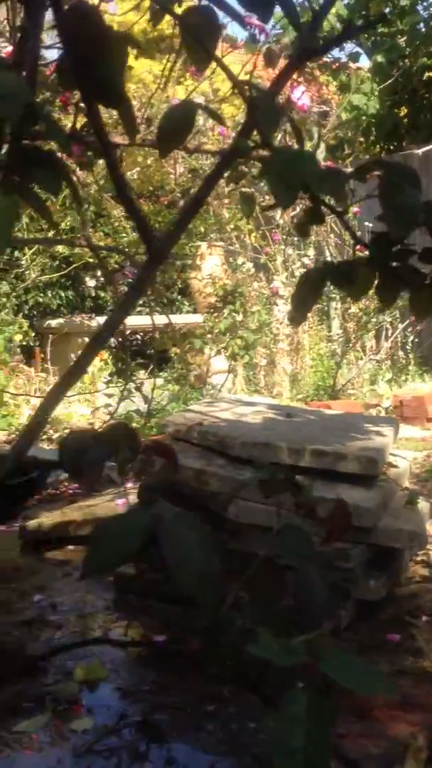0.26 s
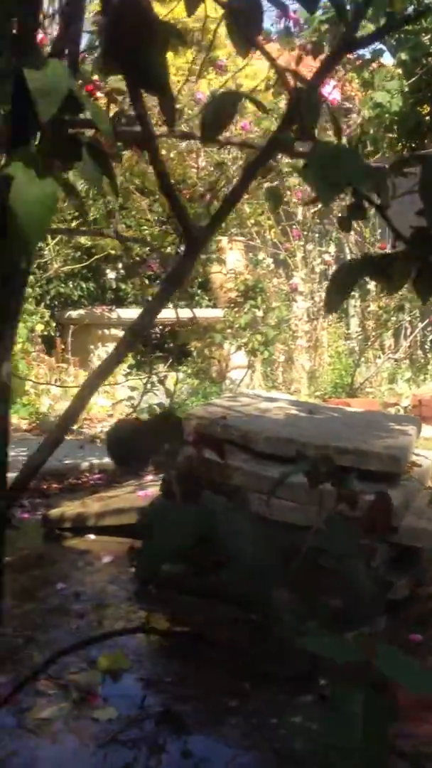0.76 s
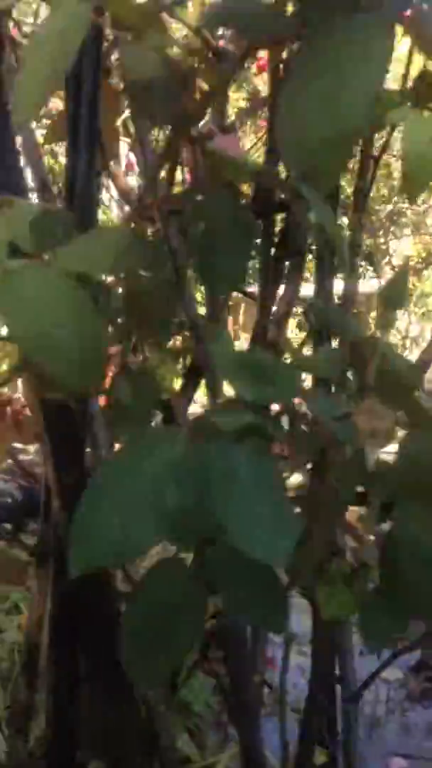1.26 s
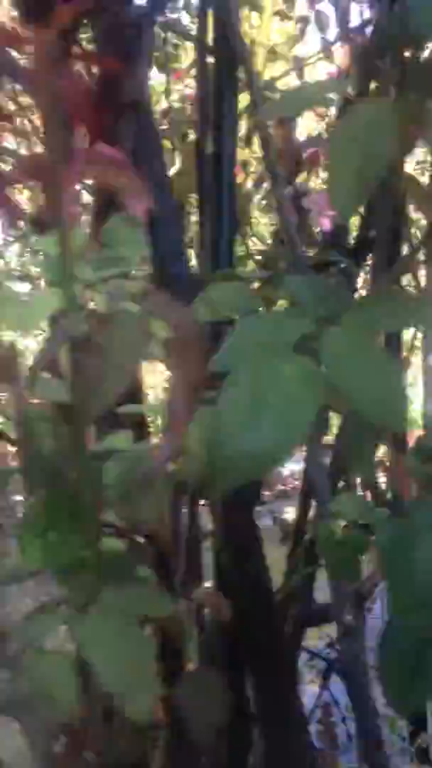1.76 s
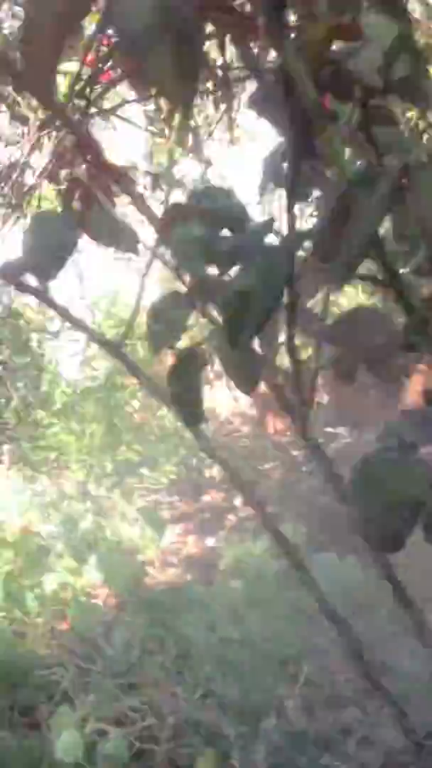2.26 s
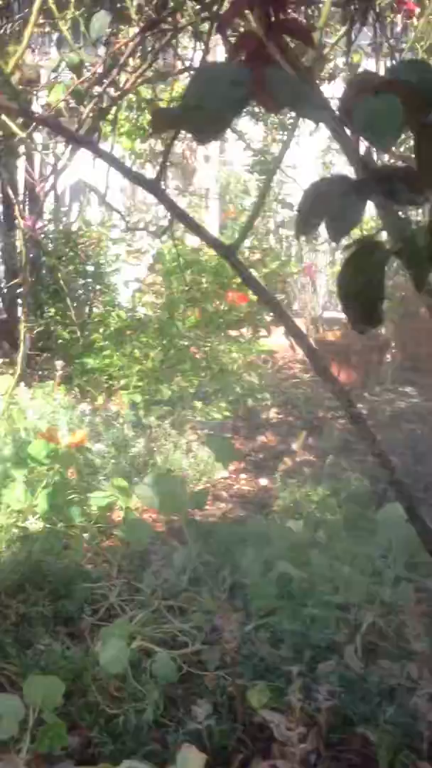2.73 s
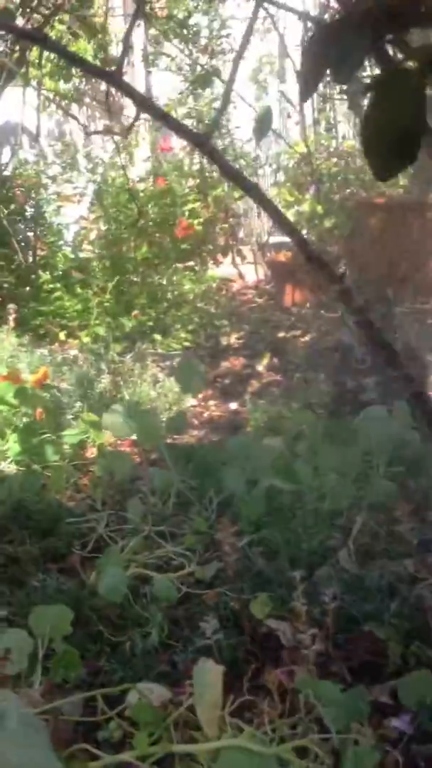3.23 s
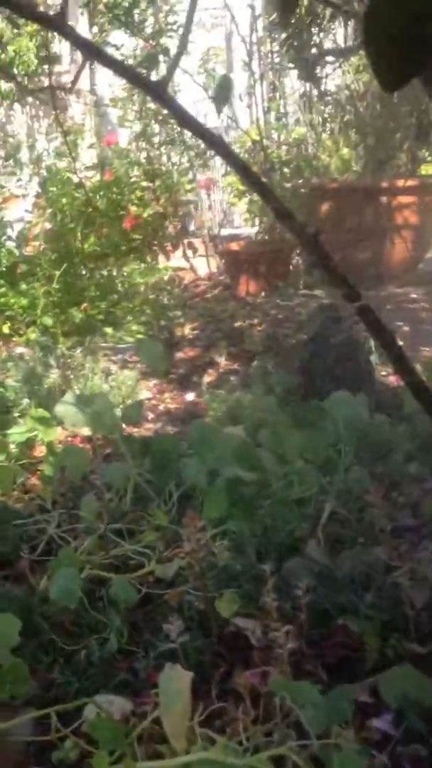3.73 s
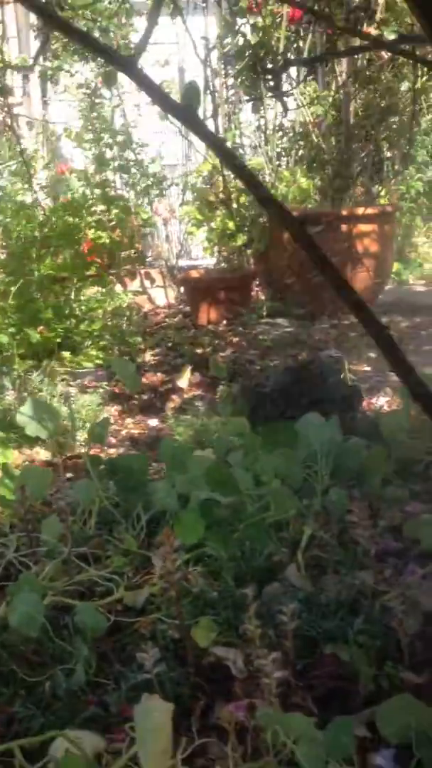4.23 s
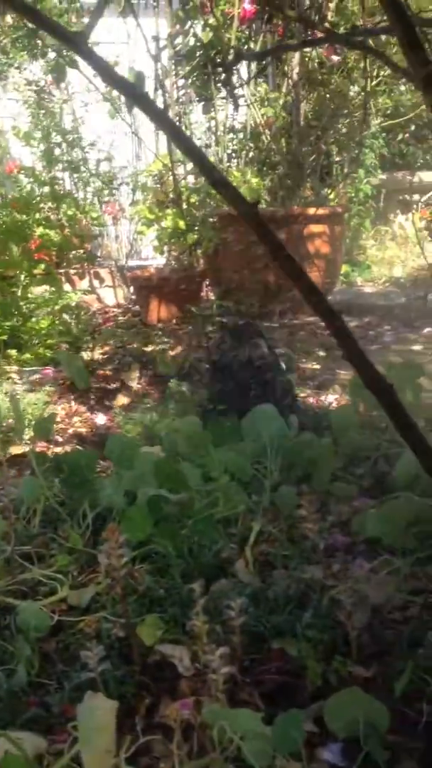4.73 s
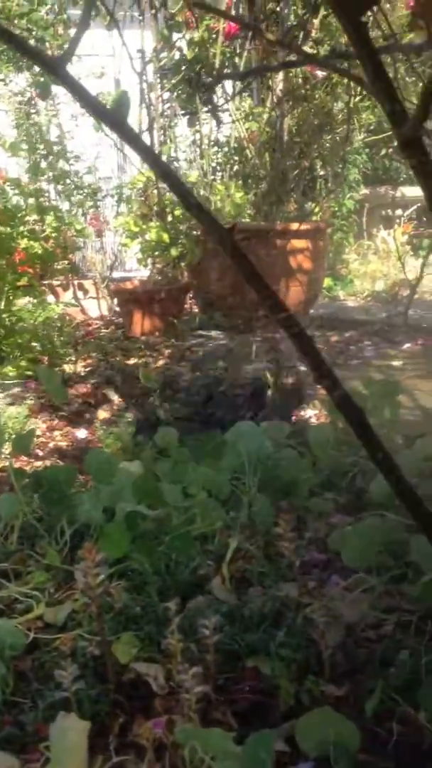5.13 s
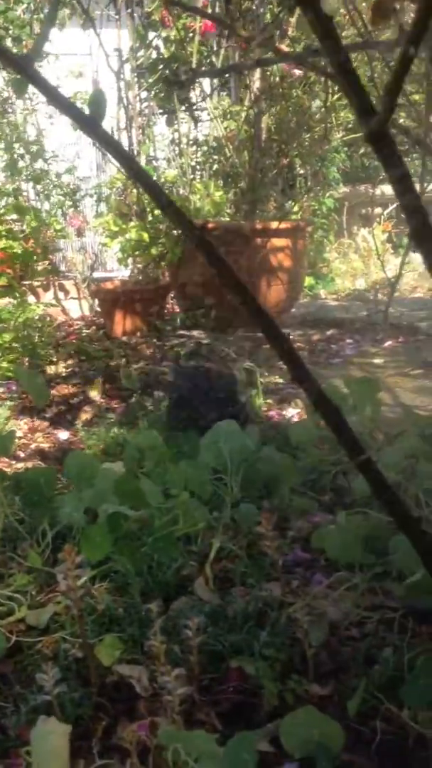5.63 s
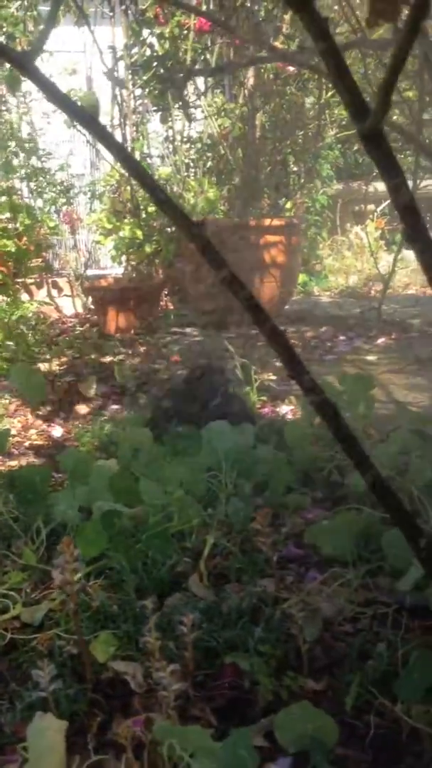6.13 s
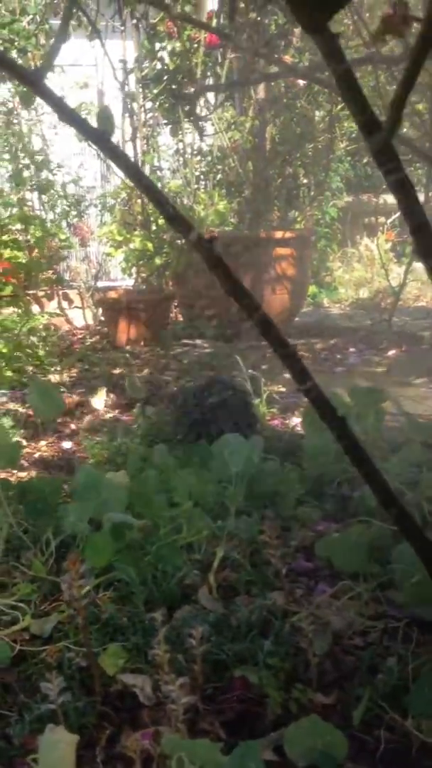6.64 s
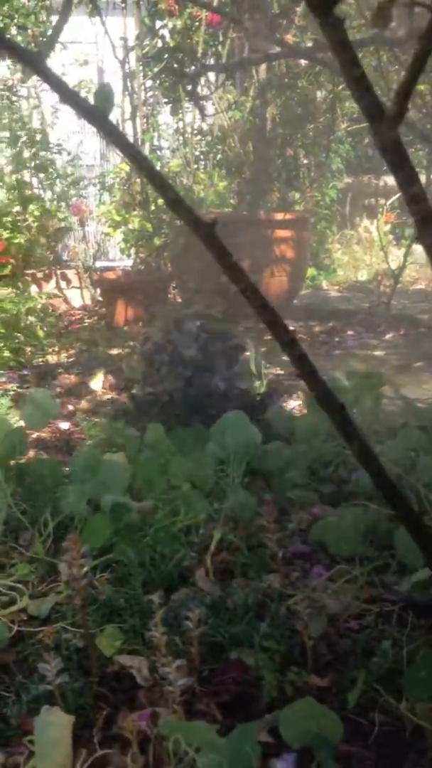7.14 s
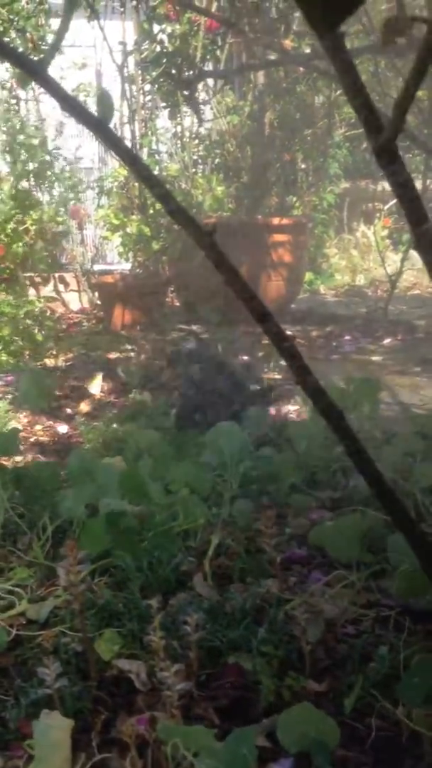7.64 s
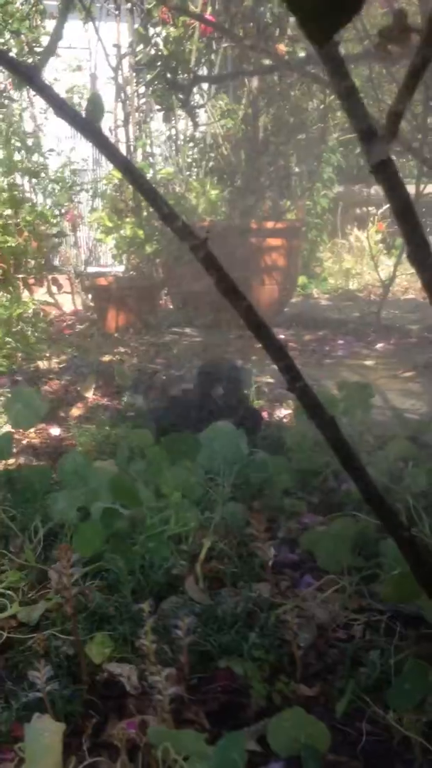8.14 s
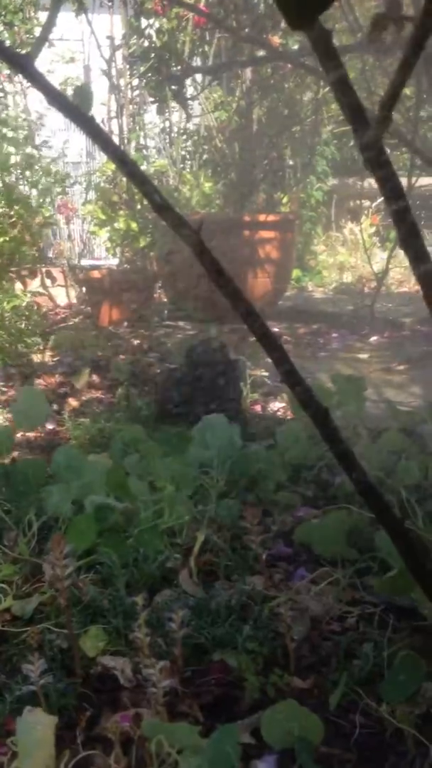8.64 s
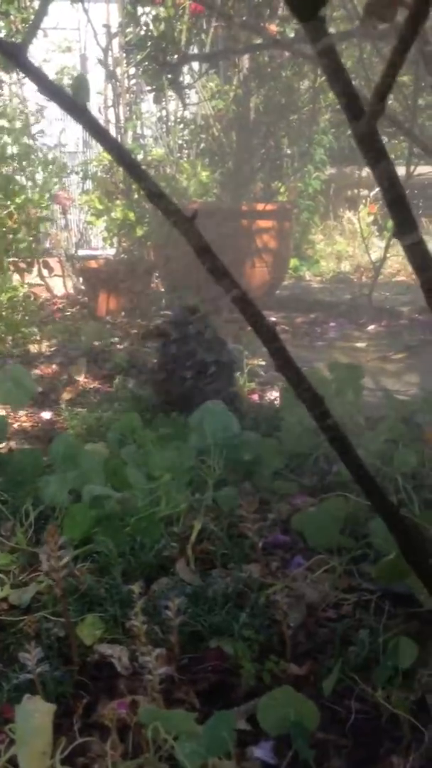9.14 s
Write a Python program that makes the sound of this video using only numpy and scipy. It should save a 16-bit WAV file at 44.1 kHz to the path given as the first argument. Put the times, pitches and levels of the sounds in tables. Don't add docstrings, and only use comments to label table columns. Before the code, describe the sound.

A continuous water spray, nearly mono, heard from a handheld microphone among plants. At first it is softer and screened by foliage; short wet swishes on leaves pass between one and two seconds, then the spray opens into a fuller, crisp hiss. Sparse sharp clicks of near drops follow, with dull drumming on soil and occasional low wind bumps, more frequent later.

```python
import sys
import numpy as np
from scipy import signal
from scipy.fft import rfft, irfft, next_fast_len
from scipy.io import wavfile
from scipy.ndimage import uniform_filter1d

SR = 44100
rng = np.random.default_rng(int(sys.argv[2]) if len(sys.argv) > 2 else 0)


def convert_level_to_amplitude(level_db):
    exponent = np.asarray(level_db, float) / 20
    return 10 ** exponent


def persist_wave(psi):
    counts = np.round(np.clip(psi, -1, 1) * 32767).astype(np.int16)
    wavfile.write(sys.argv[1], SR, np.atleast_2d(counts).T)


N = 414099

# time in seconds, hiss level in dB, view of the jet (0 screened, 1 open).
SPRAY_COURSE = [(0, -35, 0.33), (.55, -36, .25), (.92, -35.5, .25), (1.2, -34, .33), (1.6, -34, 0.28),
                (2.0, -32, .45), (2.45, -31, 0.54), (2.9, -30.5, 0.71), (3.6, -30.5, 0.78),
                (4.5, -30, 0.97), (5.6, -29.5, 1.1), (6.5, -29, 1.07), (8.0, -29, 1.04),
                (9.39, -28.5, 1.04)]
FULL_HISS_DB = -30
FRAME = 1024


def rms_one(x):
    return x / np.sqrt(np.mean(x ** 2) + 1e-20)


def in_time(rows):
    s, *columns = np.transpose(rows)
    return [np.interp(np.arange(N) / SR, s, c) for c in columns]


def colour(x, spectrum):
    size = next_fast_len(N)
    hz, db = np.transpose(spectrum)
    bin_hz = np.arange(size // 2 + 1) * SR / size
    gain = convert_level_to_amplitude(np.interp(np.log(bin_hz + 1), np.log(hz), db))
    return rms_one(irfft(rfft(x, size) * gain, size)[:N])


def drift(rate):
    pole = np.exp(-80 * np.pi * rate / SR)
    slow = signal.lfilter([1], [1, -2 * pole, pole * pole], rng.standard_normal(N // 40 + 2002))[2000:]
    slow -= uniform_filter1d(slow, size=400)
    return np.interp(np.arange(N) / 40, np.arange(len(slow)), rms_one(slow))


def band(x, low_hz, high_hz, order=2):
    return signal.sosfilt(signal.butter(order, [low_hz, high_hz], "band", fs=SR, output="sos"), x)


def drops(per_s, spread_db):
    size = convert_level_to_amplitude(spread_db * np.minimum(rng.exponential(1, N), 5)) * rng.choice([-1, 1], N)
    return rms_one(size * (rng.random(N) < per_s / SR))


def spray(mist_hz=9000, mist_db=-1.0, low_drops_db=-7.0, surge_db=.5, patchy_db=0.47):
    # frequency in Hz, density in dB per Hz.
    screened = [(710, -32.5), (1200, -15), (2400, -7.5), (3300, -8), (3900, -7), (4450, -4), (4800, -3),
                (5150, -2), (6000, -4), (6600, -7.5), (8000, -9), (9500, -11.5), (12000, -12.5),
                (15500, -14.5)]
    facing = [(710, -22), (1300, -12.5), (2600, -4), (3300, -3), (4600, -1), (7000, -2.5), (7900, -1.5),
              (9900, -5.5), (11700, -3), (13500, -5.5), (15500, -4.5)]
    sizzle_db_per_view, sizzle_wander_db = 1.2, .26
    hiss_db, view = in_time(SPRAY_COURSE)

    near = drops(per_s=3500, spread_db=2.5)
    bright = signal.sosfilt(signal.butter(2, mist_hz, "high", fs=SR, output="sos"), near)
    water = rng.standard_normal(N) + convert_level_to_amplitude(low_drops_db) * near + convert_level_to_amplitude(mist_db) * bright

    size = next_fast_len(N)
    spectrum = rfft(water, size)
    spectrum /= uniform_filter1d(np.abs(spectrum), size=4000)
    bin_khz = np.arange(len(spectrum)) * SR / size / 1000
    third_octave = 3 * np.log2(bin_khz + 1e-3).clip(0, 4)

    surge = surge_db * (.7 * drift(12) + .7 * drift(40))
    sizzle = sizzle_db_per_view * view + sizzle_wander_db * drift(1.5)
    patches = np.zeros(N)
    for k in range(13):
        swing_db = surge + patchy_db * drift(14)
        if k == 9:
            swing_db = swing_db + sizzle
        share = np.clip(1 - np.abs(third_octave - k), 0, 1)
        patches += convert_level_to_amplitude(swing_db) * irfft(spectrum * share, size)[:N]

    open_view = np.clip(view, 0, 1.3)
    mixed = (1 - open_view) * colour(patches, screened) + open_view * colour(patches, facing)
    return convert_level_to_amplitude(hiss_db) * mixed


def drumming(thuds_db=-4.0, level_db=4.5):
    # frequency in Hz, density in dB per Hz.
    soil = [(71, -53), (120, -12.5), (358, -4.5), (406, -3), (492, -3), (828, -3), (1310, -3.5),
            (2500, -5.5), (3250, -31.5), (5500, -120)]
    hiss_db, view = in_time(SPRAY_COURSE)
    water = rng.standard_normal(N) + convert_level_to_amplitude(thuds_db) * drops(per_s=600, spread_db=3.0)
    drum_db = -43.0 + 1.4 * (hiss_db - FULL_HISS_DB) - 7.0 * view
    return convert_level_to_amplitude(drum_db + level_db + 0.74 * drift(6.1)) * colour(water, soil)


def brushes():
    # loudest moment in seconds, level in dB, length in ms, centre in Hz, width in octaves.
    crossings = [(1.15, -44, 18, 3200, .4), (1.148, -42, 16, 4750, .15), (1.2, -44, 50, 4900, .25),
                 (1.366, -38.5, 24, 1460, .3), (1.335, -45, 22, 1200, .6), (1.349, -32, 40, 2800, 2.3),
                 (1.34, -38, 32, 6500, .8), (1.45, -40, 45, 2400, 1.2), (1.445, -39.5, 65, 4950, .25),
                 (1.63, -43, 100, 5800, .3), (1.68, -47, 52, 1330, .2), (2.06, -43, 90, 1400, 1.1)]
    rise_share = .7
    t = np.arange(N) / SR
    water = rng.standard_normal(N) + .45 * drops(per_s=1900, spread_db=1.0)
    out = np.zeros(N)
    for s, db, ms, hz, octaves in crossings:
        length_ms = np.where(t < s, rise_share * ms, ms)
        swell = np.exp(-((t - s) * 1000 / length_ms) ** 4)
        half_width = 2 ** (octaves / 2)
        out += convert_level_to_amplitude(db) * swell * rms_one(band(water, hz / half_width, hz * half_width))
    return out


def ticks(level_db=0.3):
    # time in seconds, peak level in dB.
    near_drops = [(0.093, -24), (0.8848, -23), (0.9713, -23), (1.146, -21), (1.2013, -22), (2.0951, -21),
                  (3.1372, -19), (3.5648, -18), (3.9937, -16), (4.0336, -17), (4.1837, -18), (4.6953, -16),
                  (4.8674, -16), (4.9205, -16), (5.161, -16), (5.3155, -15), (6.0896, -15), (6.1778, -16),
                  (6.6069, -16), (6.6412, -15), (7.3119, -16), (7.3498, -16), (8.0932, -16), (8.1572, -15),
                  (8.6803, -16), (8.7605, -13), (8.7707, -11), (8.7983, -16)]
    stray_count, stray_over_hiss_db = 14, 12.5
    stray = rng.integers(SR, N, size=stray_count)
    stray_db = in_time(SPRAY_COURSE)[0][stray] + stray_over_hiss_db
    s, db = np.hstack([np.transpose(near_drops), [stray / SR, stray_db]])
    pick = rng.random((len(s), 2))
    polarity = np.sign(pick[:, 1] - .5)
    out = np.zeros(N)
    shares = [1 - .5 * pick[:, 0], pick[:, 0]]
    for share, (low_hz, high_hz) in zip(shares, [(8000, 16000), (10500, 13000)]):
        clicks = np.zeros(N) + 1e-18
        clicks[(s * SR).astype(int) - 3] = convert_level_to_amplitude(db + level_db) * share * polarity
        out += 3.3 * band(clicks, low_hz, high_hz)
    return out


def ground():
    swing_db = .7 * (in_time(SPRAY_COURSE)[0] - FULL_HISS_DB)
    return convert_level_to_amplitude(-58.0 + swing_db) * rms_one(band(rng.standard_normal(N), 115, 259.7, order=3))


def puffs(eddies, overtone=1.7, overtone_db=-14.0):
    port_hz, port_spread = 171, .14
    undertone, undertone_db, undertone_longer = .47, -17.0, 1.8
    t = np.arange(-2000, 2000) / SR
    chance = rng.random((len(eddies), 4))
    padded = np.zeros(N + len(t))
    for (s, db, ms), (a, b, c, d) in zip(eddies, chance):
        purer_db = .8 * (ms - 6.5)
        hz = port_hz * (1 + port_spread * (2 * c - 1))
        over_db = overtone_db + .58 * (db + 32.5) - purer_db - 1.33 * np.clip(t * 1000, -6, 20)
        wave = np.cos(2 * np.pi * (hz * t + a))
        wave += convert_level_to_amplitude(over_db) * np.cos(2 * np.pi * (overtone * hz * t + b))
        late = t * 1000 / (.6 * ms + 2.5)
        push = convert_level_to_amplitude(undertone_db - purer_db) * np.cos(2 * np.pi * (undertone * hz * t + d))
        push *= np.exp(-(late / undertone_longer) ** 2)
        at = round(s * SR)
        padded[at:at + len(t)] += convert_level_to_amplitude(db) * (wave * np.exp(-late ** 2) + push)
    return padded[len(t) // 2:][:N]


def breeze(lumpy_db=1.5, ceiling_db=-50.5):
    # time in seconds, rumble level in dB.
    steady_air = [(0, -62), (.65, -61), (1.05, -64), (1.5, -57), (2.3, -59.5), (2.8, -65), (3.7, -67),
                  (4.5, -63.5), (5.2, -56), (6.3, -54.5), (7.1, -61), (8.3, -55), (9.39, -57)]
    # time in seconds, rumble level in dB.
    gusts = [(1.41, -50), (1.97, -57), (2.9, -53), (5.0, -46), (5.23, -49), (5.49, -49), (5.59, -43),
             (6.44, -45), (6.85, -49), (7.4, -52), (7.93, -50), (8.03, -47), (8.64, -49), (8.93, -48)]
    # time in seconds, peak level in dB, length in ms.
    eddies = [(0.194, -34, 7.3), (0.226, -25.5, 3.2), (0.325, -36, 6.5), (1.732, -39, 5.3),
              (5.351, -35.5, 5), (5.831, -42, 16), (6.046, -36, 5.6), (6.342, -33.5, 6.6),
              (6.369, -38.5, 15), (6.551, -35, 3.6), (6.588, -28, 12), (6.616, -34.5, 4.6),
              (6.638, -35, 4.5), (7.669, -33, 9.5), (7.684, -37.5, 8.8), (7.706, -33, 7.5), (7.79, -42, 7),
              (8.071, -28, 6.6), (8.082, -23, 9), (8.094, -38, 13), (8.168, -30.5, 5.4), (8.188, -38, 17),
              (8.304, -37, 12), (8.398, -37, 5.2), (8.619, -38, 7.3), (9.31, -32.5, 6.5), (9.323, -32, 5.7),
              (9.352, -39, 8), (9.365, -36, 5.3)]
    # frequency in Hz, density in dB per Hz.
    rumble_spectrum = [(13, -66), (22, -40), (38, -28), (161, 1), (188, -3), (232, -4.5), (275, -3.5),
                       (310, -11), (400, -15.5), (520, -39), (880, -120)]
    gust_fade_db_per_s, swell_under_puff_db = 331, 15.5
    deep_hz, deep_extra_swing, deep_pivot_db = 110, .3, -62.0

    air_db = in_time(steady_air)[0]
    now = np.arange(N) / SR
    eddy_swells = [(s, db - swell_under_puff_db) for s, db, ms in eddies]
    for s, db in list(gusts) + eddy_swells:
        air_db = np.maximum(air_db, db - gust_fade_db_per_s * np.abs(now - s))
    air_db = np.minimum(air_db, ceiling_db)

    rumble = colour(rng.standard_normal(N), rumble_spectrum)
    deep = signal.sosfiltfilt(signal.butter(2, deep_hz, fs=SR, output="sos"), rumble)
    swinging = rumble - deep + convert_level_to_amplitude(deep_extra_swing * (air_db - deep_pivot_db)) * deep
    return convert_level_to_amplitude(air_db + lumpy_db * drift(15)) * swinging + puffs(eddies)


def scene():
    mono = spray() + drumming() + brushes() + ticks() + breeze() + ground()
    return np.stack([mono, mono])


def microphone(x):
    # frequency in Hz, width in Hz, gain in dB.
    housing = [(2810, 160, 1.5), (3247, 270, 2), (4796, 88, 1.5), (5110, 120, -3), (5950, 120, 1.5),
               (6510, 110, 2.5), (7940, 300, 1.5)]
    cutoff_hz, bass_cut_hz = 15325, 69
    size = next_fast_len(N + 4096)
    at = np.arange(size // 2 + 1) * SR / size
    gain = convert_level_to_amplitude(sum(db * np.exp(-((at - hz) / width) ** 2) for hz, width, db in housing))
    gain *= np.clip((cutoff_hz - at) / 40, 0, 1)
    gain /= np.sqrt(1 + (bass_cut_hz / (at + 1)) ** 6)
    return irfft(rfft(x, size) * gain, size)[:N]


def lapped_cosines():
    n, k = np.arange(2 * FRAME) + .5, np.arange(FRAME) + .5
    cosines = np.cos(np.pi / FRAME * np.outer(k, n + FRAME / 2))
    return np.sqrt(2 / FRAME) * cosines * np.sin(np.pi * n / 2 / FRAME)


def coarse_recorder(x):
    # frequency in Hz, band rms over step size in dB.
    coarseness = [(200, 16), (600, 10), (1300, 6), (2300, 3), (3500, 1), (5000, -1), (7000, -2.5),
                  (9000, -5), (11000, -4.5), (13000, -6.6), (15500, -6.8)]
    # time in seconds, finer by dB.
    spare_bits = [(0, 2), (2.0, 1.8), (2.6, 0), (7.3, 0), (8.0, 1.6), (9.39, 1.6)]
    basis = lapped_cosines()
    lead, count = 2 * FRAME - 98, N // FRAME + 4
    halves = np.pad(x, (lead, count * FRAME - N - lead)).reshape(count, FRAME)
    lines = np.hstack([halves[:-1], halves[1:]]) @ basis.T

    near_power = uniform_filter1d(lines ** 2, size=32, axis=1)
    near_power = uniform_filter1d(near_power, size=5, axis=0)
    local_rms = np.sqrt(near_power.clip(1e-20))
    hz, db = np.transpose(coarseness)
    s, finer_db = np.transpose(spare_bits)
    fine_db = np.interp((np.arange(FRAME) + .5) * SR / 2 / FRAME, hz, db)
    fine_db = fine_db + np.interp(np.arange(count - 1) * FRAME / SR, s, finer_db)[:, None]
    uneven_db = rng.normal(0, .7, (count - 1, FRAME // 32)).repeat(32, axis=1)
    step = local_rms / convert_level_to_amplitude(fine_db + uneven_db)

    whole = np.floor((np.abs(lines) / step) ** .75 + .4054)
    lines = np.sign(lines) * step * whole ** (4 / 3)
    frames = lines @ basis
    halves = np.pad(frames[:, :FRAME], ((0, 1), (0, 0))) + np.pad(frames[:, FRAME:], ((1, 0), (0, 0)))
    return halves.ravel()[lead:lead + N]


def unlike_sides(mono, split_db=-2.3):
    # time in seconds, low edge in Hz, high edge in Hz.
    splits = [(0.706, 5640, 6940), (0.823, 8190, 9710), (0.823, 11680, 13140), (1.659, 4590, 5730),
              (1.801, 6220, 7630), (1.801, 13730, 15200), (2.288, 5610, 6940), (2.288, 9580, 11080),
              (2.544, 13040, 15210), (3.056, 7500, 9010), (3.657, 5620, 6960), (3.657, 8940, 11070),
              (4.355, 4180, 5210), (4.355, 11660, 13150), (5.004, 7500, 9010), (5.283, 6840, 8330),
              (5.283, 11650, 13840), (5.585, 4590, 5740), (5.585, 7540, 9000), (5.679, 4160, 5740),
              (5.679, 10270, 12460), (8.021, 4170, 5230), (9.182, 6830, 8330), (9.345, 4180, 5210)]
    grid = 546
    basis = lapped_cosines()
    padded = np.pad(mono, (0, 2 * FRAME))
    side = np.zeros(N + 2 * FRAME)
    noise = rng.uniform(-1, 1, (len(splits), FRAME))
    for (s, low_hz, high_hz), fill in zip(splits, noise):
        at = grid + FRAME * (round((s * SR - grid) / FRAME) - 1)
        first = round((low_hz + 50) * 2 * FRAME / SR)
        last = round((high_hz - 50) * 2 * FRAME / SR)
        lines = slice(first, last)
        energy = np.mean((basis[lines] @ padded[at:at + 2 * FRAME]) ** 2)
        patch = rms_one(fill[lines]) @ basis[lines]
        side[at:at + 2 * FRAME] += convert_level_to_amplitude(split_db) * np.sqrt(energy) * patch
    return side[:N]


def roll_off(x):
    return signal.sosfilt(signal.butter(12, 15370, fs=SR, output="sos"), x)


def record(dry):
    mono = coarse_recorder(microphone(dry[0]))
    side = unlike_sides(mono)
    return roll_off(np.stack([mono + side, mono - side]))


dry = scene()
out = record(dry)
persist_wave(out)
```